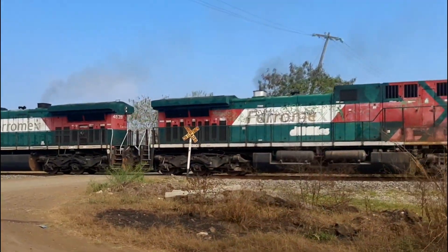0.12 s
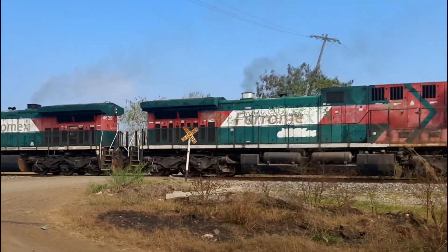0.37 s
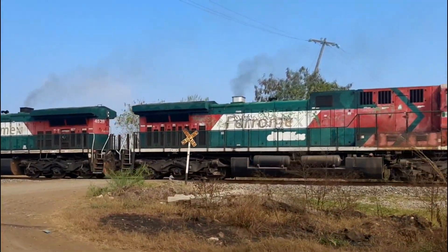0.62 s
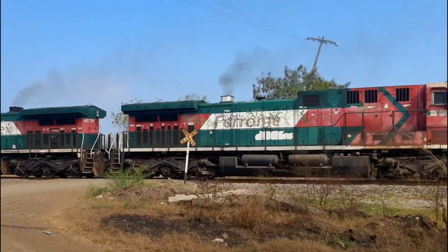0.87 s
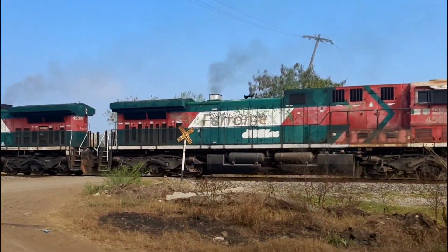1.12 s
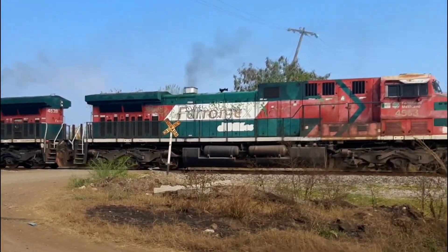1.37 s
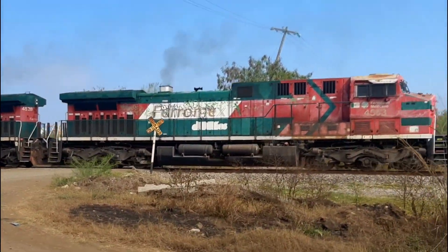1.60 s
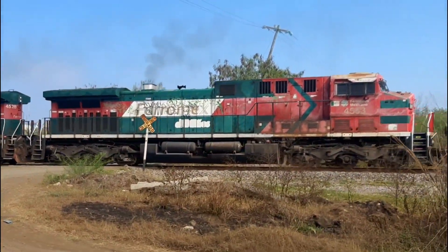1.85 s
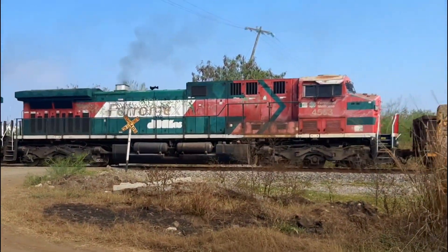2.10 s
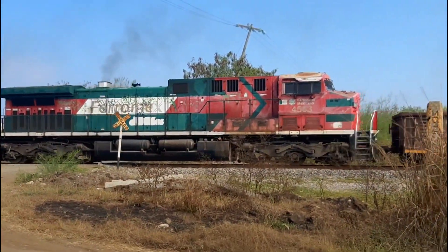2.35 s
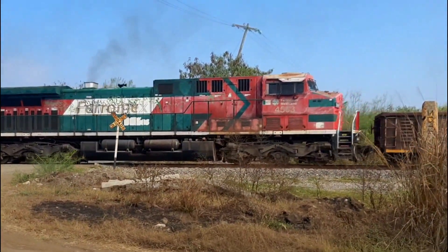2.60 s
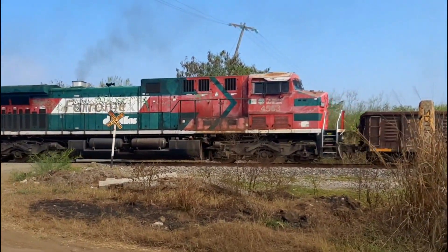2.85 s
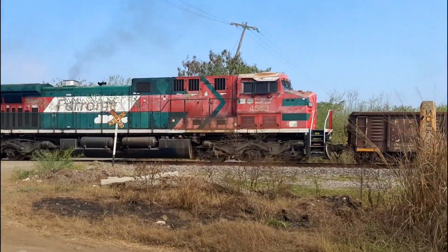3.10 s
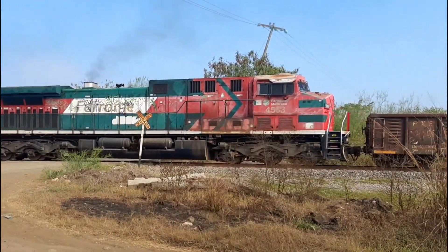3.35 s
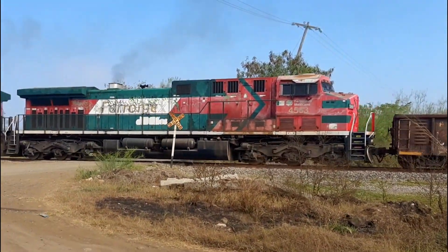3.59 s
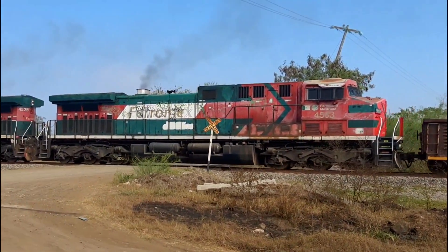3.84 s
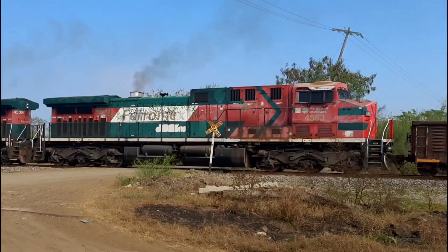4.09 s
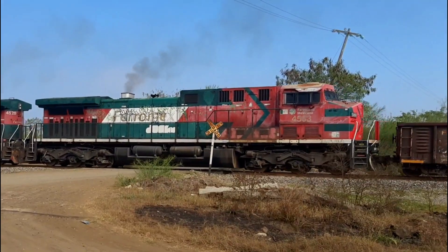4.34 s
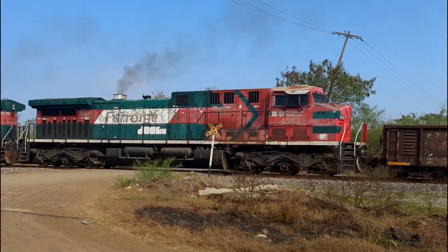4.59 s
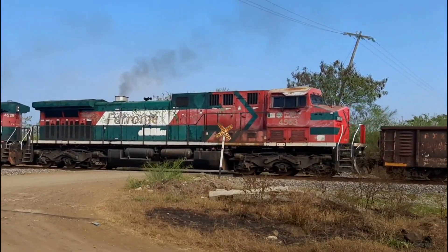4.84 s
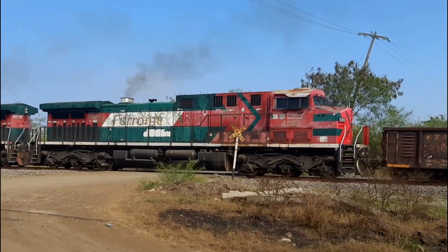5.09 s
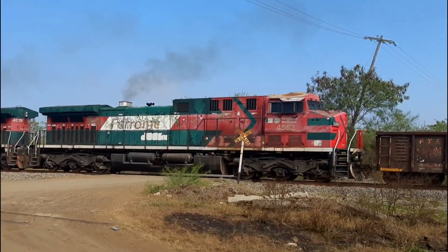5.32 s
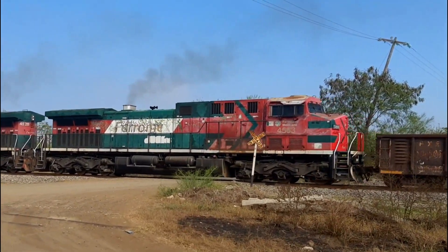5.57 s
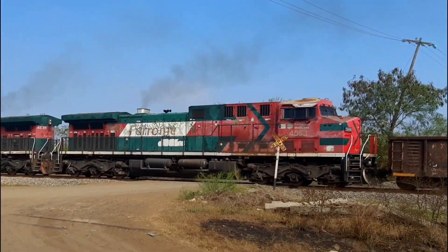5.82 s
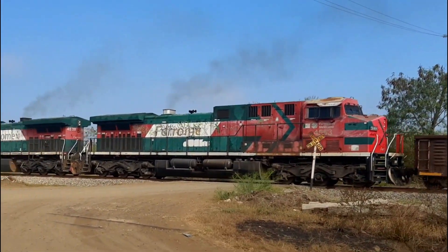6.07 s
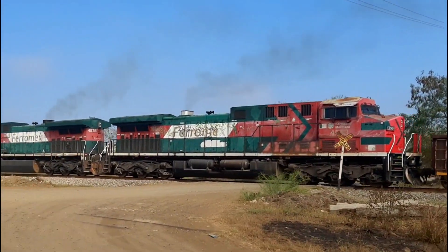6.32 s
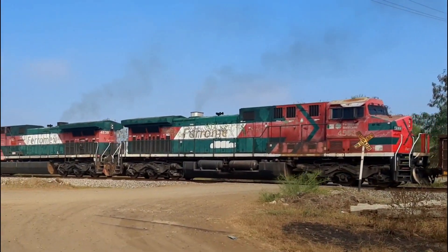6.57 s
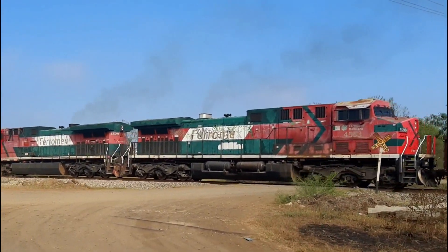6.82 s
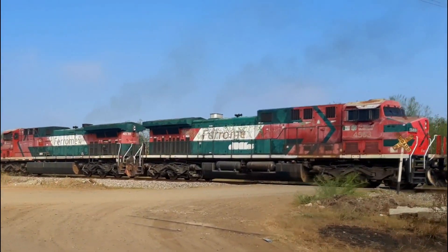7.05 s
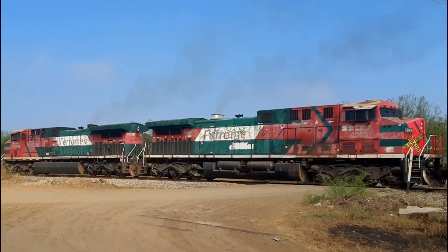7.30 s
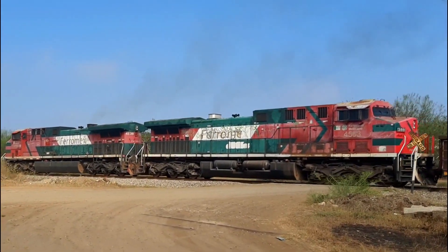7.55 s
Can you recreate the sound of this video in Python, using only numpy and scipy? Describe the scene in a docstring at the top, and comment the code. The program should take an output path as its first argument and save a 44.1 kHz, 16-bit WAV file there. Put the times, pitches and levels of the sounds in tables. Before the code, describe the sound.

A close, open-air stereo pickup of paired diesel engines under load: continuous low pulsing and rough exhaust roar, slowly speeding up from start to end. Bright air hiss is stronger early, then duller, with clustered puffs around 2 and 6 to 7 seconds. Short grainy valve bursts punctuate it, fan noise swells, a faint whine comes and goes, and wind briefly bumps the microphone ports.

```python
"""A deep throb runs throughout, over a broad roar: two diesel locomotives pull away over a crossing.
Their engines speed up almost in step, and their exhaust tones beat as they slip against each other.
Filtered noise makes the roar of stacks and the hissing, puffing air leak; fans rush in two narrow bands.
A gear whines as a wavering tone, drain valves spit bursts of grainy noise,
and a few wind pops, short dying tones, hit the microphone ports."""
import sys
import numpy as np
from scipy import signal
from scipy.fft import rfft, irfft
from scipy.io import wavfile
from scipy.ndimage import uniform_filter1d, map_coordinates

SR = 44100
rng = np.random.default_rng(int(sys.argv[2]) if len(sys.argv) > 2 else 0)


def makeup_ratio(level_db):
    """Linear amplitude ratio for a level in decibels (20 dB per factor of ten)."""
    decades = np.asarray(level_db, float) / 20
    return 10 ** decades


def store_pcm(level_fs):
    """Save levels as 16-bit WAV."""
    pcm = np.round(np.clip(level_fs, -1, 1) * 32767).astype(np.int16)
    wavfile.write(sys.argv[1], SR, np.atleast_2d(pcm).T)


N = 338687
T = np.arange(N) / SR  # time of each sample, s

# How fast the engines run: time_s, first_engine_cycles_per_s, second_engine_cycles_per_s
ENGINE_SPEED = [(0.0, 5.96, 5.958), (0.8, 6.087, 6.091), (1.5, 6.206, 6.235), (2.2, 6.342, 6.365),
                (3.0, 6.466, 6.446), (3.8, 6.576, 6.572), (4.6, 6.706, 6.711), (5.2, 6.786, 6.841),
                (5.6, 6.884, 6.928), (6.0, 6.986, 7.018), (6.5, 7.073, 7.1), (7.0, 7.18, 7.17),
                (7.68, 7.216, 7.241)]
START_TURNS = (.537, .9653)  # where each engine stands in its cycle at the start
# Strong exhaust tones before boom and gain: cycle_multiple,
# first_engine_start_db, first_engine_end_db, second_engine_start_db, second_engine_end_db
STRONG_ORDERS = [(8, -30.5, -28.0, -33.5, -40.0), (9, -32.5, -38.5, -43.5, -29.0),
                 (10, -32.5, -43.5, -31.0, -39.5), (11, -22.0, -35.0, -35.0, -23.0),
                 (12, -33.5, -35.0, -34.0, -27.5), (13, -28.0, -9.5, -20.5, -14.5),
                 (14, -34.0, -35.0, -25.0, -29.5), (15, -20.0, -40.0, -32.0, -30.5),
                 (16, -33.0, -53.0, -31.0, -26.0), (17, -19.0, -60.0, -41.0, -19.5),
                 (18, -32.0, -40.0, -47.5, -54.5), (19, -16.0, -53.5, -36.5, -24.0),
                 (20, -30.0, -40.0, -35.5, -32.5), (28, -34.5, -37.0, -32.0, -36.0),
                 (29, -41.5, -53.5, -32.5, -38.5)]
# Exhaust tones that peak together; the others start anywhere: cycle_multiple
IN_STEP_ORDERS = (11, 12, 13)
# The stacks boom near their resonance: pitch_hz, gain_db
STACK_BOOM = [(50, -7.5), (66, 1.5), (74, 9.5), (80, 7.0), (87, -5.0), (94, -8.0), (104, -0.5), (118, -4.0),
              (135, -3.0)]
# Level curve for the fainter exhaust tones, before gain: cycle_multiple, level_db
WEAK_LEVELS = [(21, -47), (24, -51), (26, -51), (27, -45), (31, -45), (34, -51), (36, -47.5), (40, -54)]
# Which fainter exhaust tones sound: cycle_multiple
WEAK_ORDERS = (21, 22, 23, 24, 25, 26, 27, 30, 31, 32, 33, 34, 35, 36, 37, 38, 39, 40)
EXHAUST_GAIN_DB = (0.33, 0.43)  # at start and end, almost steady

# Loudness of the stacks' roar: time_s, level_db
STACK_LEVEL = [(0, -32), (1.3, -32.5), (2.3, -34), (3.4, -34), (4.5, -32.5), (6, -32), (7, -31),
               (7.68, -31)]
# Colour of the low rumble: pitch_hz, relative_db_per_hz
RUMBLE_COLOUR = [(20, -21), (42, -21), (60, 5.5), (90, -1), (140, 4), (190, -3), (260, -7), (330, -12),
                 (500, -72), (900, -120)]
# Three colours of the stacks' roar in turn: pitch_hz, relative_db_per_hz
STACKS_EARLY = [(190, -15.5), (330, -9), (601, -2.5), (666, -4.5), (1130, -9), (1630, -13), (1790, -9),
                (2020, -12), (2230, -10.5), (3000, -22), (3900, -52), (6600, -120)]
STACKS_MIDDLE = [(190, -14), (330, -3.5), (491, -14.5), (601, -4), (730, -2.5), (928, -9), (1140, -11),
                 (1360, -9), (2130, -9), (2340, -10), (3000, -16), (3900, -55), (6600, -120)]
STACKS_LATE = [(190, -27), (330, -11), (376, -10), (443, -3.5), (538, -5.5), (636, 0), (920, -12.5),
               (1110, -5), (1330, -13), (1600, -2.5), (1790, -8.5), (2050, -4), (2300, -9), (3000, -9),
               (3900, -15.5), (6600, -120)]
# The air leak turns away: time_s, level_db, later_colour_share_0_to_1
LEAK_COURSE = [(0, -30, 0.34), (.6, -33, 0.12), (1.4, -32.5, 0.18), (2.5, -34, .8), (3.4, -38.5, 0.77),
               (4.1, -37, 0.65), (5, -35.5, 0.74), (6.1, -35, 0.77), (7.68, -37, 0.58)]
# Colour of the leak, earlier and later: pitch_hz, relative_db_per_hz
LEAK_EARLY_COLOUR = [(1530, -33), (2600, -35), (2740, -4), (3720, -6.5), (5440, 2), (6390, 2), (7240, -2.5),
                     (8370, -22.5), (9000, -45), (11700, -62), (19800, -120)]
LEAK_LATE_COLOUR = [(1530, -30), (2600, -21), (3090, -9.5), (3350, 1), (3550, -3.5), (3860, 1),
                    (4170, -0.5), (4510, 1), (6160, -5.5), (7310, -21.5), (8500, -39), (9000, -43),
                    (11700, -68), (19800, -120)]
# Puffs of the air leak: centre_s, level_db
LEAK_PUFFS = [(1.27, -31.5), (2.13, -31.5), (2.285, -31), (2.45, -35), (2.53, -35), (4.66, -33),
              (6.19, -31), (6.3, -32.5), (6.47, -36), (6.62, -35), (6.76, -30), (6.91, -31), (7.0, -36.5),
              (7.47, -35)]
# Colour of the highest hiss: pitch_hz, relative_db_per_hz
TOP_COLOUR = [(6000, -38), (8600, -6.5), (9600, -2.5), (11100, 1), (14500, -3), (15700, -6.5)]
# How alike left and right are, for all the roar: pitch_hz, likeness_0_to_1
LIKENESS = [(60, 0.61), (150, 1), (380, 0.92), (950, 0.87), (1500, 0.32), (2400, 0.13), (5500, 0.5),
            (8000, 0.13), (15000, .25)]
RUMBLE_OVER_ROAR_DB, RUMBLE_SWING = 5.5, 0.74  # swing: share of the roar's rise and fall in dB
TOP_OVER_LEAK_DB, PUFF_WIDTH_S = -19.5, 0.016
# how much later the left side hears it, at start and end: the train crosses the front
STACK_LAG_MS, LEAK_LAG_MS = (-.12, 0.11), (-0.12, 0.22)
# ground echo: shortest delay, when that happens, growth per second squared
ECHO_MS, ECHO_NEAR_S, ECHO_GROWS_MS = 1.255, 3.21, 0.0384

# Two rushing bands of fans and blowers: time_s, lower_hz, upper_hz
FAN_PITCH = [(0, 1525, 2380), (1.3, 1520, 2390), (2.2, 1570, 2345), (4.3, 1700, 2370), (5.2, 1580, 2010),
             (7.68, 1589, 2048)]
# Their swells: centre_s, level_db, width_s, band (0 lower, 1 upper)
FAN_SWELLS = [(1.22, -40.5, 0.04, 0), (1.29, -40.5, 0.06, 1), (1.7, -44.5, 0.27, 0), (4.1, -44.5, 0.44, 1),
              (4.15, -44, .25, 0), (5, -43.5, 0.55, 0), (5.2, -51, 0.66, 1), (6.1, -47.5, 0.27, 0),
              (6.6, -44.5, 0.22, 1), (7.05, -45.5, .25, 1), (7.001, -51, .2, 0), (7.66, -42, .2, 1),
              (7.67, -44, 0.22, 0)]
FAN_FLOOR_DB = -55.5  # level between swells, before flicker

# Gear whine swells: centre_s, level_db, width_s
WHINE_SWELLS = [(1.2, -53, 0.44), (2.2, -49, 0.28), (3.8, -44, 0.14), (6.3, -51.5, 0.35)]
WHINE_FLOOR_DB = -58.5  # level between swells, before flicker

# Valve spits: start_s, level_db, hold_s, fall_by_60_db_s, left_over_right_db
VALVE_SPITS = [(.318, -29, .004, 0.046, -16.5), (1.533, -21, 0.041, 0.083, -4.5),
               (2.369, -36, 0.0059, 0.077, 7), (3.552, -27.5, .014, 0.22, 3),
               (4.265, -35.5, 0.0079, 0.1, 5), (5.096, -34, 0.0052, .047, -4.5),
               (6.113, -26.5, 0.0076, .15, 1), (6.431, -47, .0049, .029, 1), (6.771, -31.5, 0.005, .088, 3),
               (7.662, -30.5, 0.012, .1, 7.5)]
# Colour of a spit: pitch_hz, relative_db
SPIT_COLOUR = [(1470, -45), (2500, -19), (3010, -8.5), (3530, -25), (3810, -9), (5070, -7.5), (6380, 0),
               (9010, -27), (10500, -16.5), (15700, -15)]
RISE_SHARE = .55  # opening time over holding time
# brightness in dB per octave; a slowly closing valve is duller, by this slope per second of fall
BRIGHT_DB, BRIGHT_FALL_DB = 2, -14

# Wind pops, level before the decay: start_s, level_db, pitch_hz, port (0 left, 1 right)
WIND_POPS = [(2.060, -15, 560, 0), (2.106, -18, 440, 0), (2.209, -14.5, 395, 0), (2.894, -22, 300, 0)]


def unit(x):
    """Scales a sound to an average strength (rms) of 1."""
    return x / np.sqrt(np.mean(x ** 2) + 1e-20)


def along(points, hz):
    """Reads a curve of pitch and value on a logarithmic pitch axis."""
    pitch, value = np.transpose(points)
    return np.interp(np.log(hz + 1), np.log(pitch + 1), value)


def curves(rows):
    """Gives one value per sample for each column after the time."""
    s, *columns = np.transpose(rows)
    return np.array([np.interp(T, s, column) for column in columns])


def across(start, end):
    """Changes in a straight line from the first moment to the last."""
    return start + (end - start) * T / T[-1]


def wobble(rate):
    """Draws a smooth random curve through `rate` random points a second."""
    coarse = T[::32]
    place = np.clip(coarse * rate, 0, 1498)
    return np.interp(T, coarse, map_coordinates(rng.standard_normal(1500), [place]))


def swell(s, db, width):
    """Gives the power of a bell-shaped swell."""
    return makeup_ratio(2 * db) * np.exp(-((T - s) / width) ** 2)


def rush(spectra, stage, patchy_db, lag_ms, echo_ms=None, echo=0):
    """Makes stereo noise of rms 1 in narrow streaks; stage moves its colour through the spectra."""
    hz, t, z = signal.stft(rng.standard_normal((2, N + SR)), SR, nperseg=2048)

    def frames(curve):
        return np.interp(t - .5, T, curve)  # the noise has a spare half second at each end

    share = np.clip(1 - abs(frames(stage) - np.arange(len(spectra))[:, None]), 0, 1)
    power = np.array([makeup_ratio(2 * along(points, hz)) for points in spectra])
    power = power / power.sum(axis=1, keepdims=True)
    colour = np.sqrt(power.T @ share)
    patches = uniform_filter1d(rng.standard_normal(z.shape[1:]), size=5, axis=0)
    patches = unit(uniform_filter1d(patches, size=16, axis=1))
    # blend a shared noise with an opposed one to set how alike the ports are
    turn = np.arccos(np.clip(along(LIKENESS, hz), -1, 1))[:, None] / 2
    shared, own = z * colour * makeup_ratio(patchy_db * patches) * [np.cos(turn), np.sin(turn)]
    # the sound reaches one port a little later, and may come once more off the ground
    lag = np.exp(-1j * np.pi * np.outer(hz, frames(lag_ms) / 1000))
    ground = 1
    if echo:
        ground = 1 + echo * np.exp(-2j * np.pi * np.outer(hz, frames(echo_ms) / 1000))
    pair = np.array([(shared + own) * lag, (shared - own) / lag]) * ground
    sound = signal.istft(pair, nperseg=2048)[1]
    return unit(sound[:, SR // 2:][:, :N])


def cycles():
    """Adds up the turns of each engine's four-stroke cycle from its speed."""
    return np.cumsum(curves(ENGINE_SPEED), axis=1) / SR + np.array(START_TURNS)[:, None]


def exhaust(turns):
    """Uneven firing gives tones at cycle multiples, which add or cancel as the two engines slip."""
    def line(k, shift):
        return np.cos(2 * np.pi * (round(k) * turns + shift))

    speed = curves(ENGINE_SPEED).mean(axis=0)
    tones = np.zeros(N)
    for k, first_start, first_end, second_start, second_end in STRONG_ORDERS:
        shift = rng.random() * (k not in IN_STEP_ORDERS)
        level = makeup_ratio([across(first_start, first_end), across(second_start, second_end)])
        boom = makeup_ratio(along(STACK_BOOM, k * speed))
        tones += boom * (level * line(k, shift)).sum(axis=0)
    for k in WEAK_ORDERS:
        level = makeup_ratio(np.interp(k, *np.transpose(WEAK_LEVELS)) + 1.5 * wobble(1.17))
        shift = rng.random() + 0.084 * wobble(1.198)
        tones += level * line(k, shift).sum(axis=0)
    return 2 ** .5 * makeup_ratio(across(*EXHAUST_GAIN_DB)) * tones * makeup_ratio([[-.15], [.15]])


def rumble(roar_db):
    """Low noise rises and falls with the roar, over a smaller range."""
    average = roar_db.mean()
    level_db = average + RUMBLE_OVER_ROAR_DB + RUMBLE_SWING * (roar_db - average) + .8 * wobble(2.53)
    still = 0 * T
    return makeup_ratio(level_db) * rush([RUMBLE_COLOUR], still, 1.0, still)


def stacks(roar_db, flutter):
    """The stacks' noise changes colour and bearing as the train moves."""
    stage = np.interp(T, (1.3, 2.4, 3.5, 4.5), (0, 1, 1, 2))
    noise = rush([STACKS_EARLY, STACKS_MIDDLE, STACKS_LATE], stage, 1.1, across(*STACK_LAG_MS))
    return makeup_ratio(roar_db + .4 * wobble(11) + 0.45 * flutter) * noise


def leak(flutter):
    """Escaping air is a hiss with grainy puffs, a ground echo and a fainter top hiss."""
    leak_db, stage = curves(LEAK_COURSE)
    lag_ms = across(*LEAK_LAG_MS)
    echo_ms = ECHO_MS + ECHO_GROWS_MS * (T - ECHO_NEAR_S) ** 2
    air = rush([LEAK_EARLY_COLOUR, LEAK_LATE_COLOUR], np.clip(stage, 0, 1), 1.3, lag_ms, echo_ms, .18)
    puffs = sum(swell(s, db, PUFF_WIDTH_S) for s, db in LEAK_PUFFS)
    grit = makeup_ratio(2.5 * wobble(150))
    level = np.sqrt(makeup_ratio(2 * (leak_db + 0.95 * flutter)) + puffs * grit ** 2)
    hiss = level * air * makeup_ratio([[-1.1], [1.1]])
    top_db = leak_db + TOP_OVER_LEAK_DB + 1.6 * wobble(3) + .6 * flutter + 1.6 * wobble(66)
    top = makeup_ratio(top_db) * rush([TOP_COLOUR], 0 * T, .5, lag_ms)
    return hiss + top * makeup_ratio([[-.6], [.6]])


def roar():
    """Rumble, stacks and leaking air sound together; stacks and leak share one flutter."""
    roar_db, = curves(STACK_LEVEL)
    flutter = wobble(22)
    return rumble(roar_db) + stacks(roar_db, flutter) + leak(flutter)


def fans():
    """Each band is a tone with random size and phase, partly different at the two ports."""
    out = np.zeros((2, N))
    for band, hz in enumerate(curves(FAN_PITCH)):
        swells = sum(swell(*row) for *row, which in FAN_SWELLS if round(which) == band)
        level = np.sqrt(makeup_ratio(2 * FAN_FLOOR_DB) + swells)
        shared, *own = [wobble(185) + 1j * wobble(185) for _ in range(3)]
        carrier = np.exp(2j * np.pi * np.cumsum(hz) / SR)
        noise = unit(((shared + 0.94 * np.array(own)) * carrier).real)
        out += level * makeup_ratio(3.26 * wobble(22)) * noise
    return out


def whine(turns):
    """A gear meshes at a fixed multiple of the first engine's speed, with a wavering phase."""
    phase = 2 * np.pi * 212 * turns[0] + 0.66 * wobble(30)
    level = np.sqrt(makeup_ratio(2 * WHINE_FLOOR_DB) + sum(swell(*row) for row in WHINE_SWELLS))
    return 2 ** .5 * level * makeup_ratio(3.1 * wobble(6.2)) * np.sin(phase)


def spits():
    """Each drain valve opens, holds and closes on a jet of grainy air, with a weak long sigh after it."""
    out, t = np.zeros((2, N + SR)), T[:SR // 4]
    hz = np.fft.rfftfreq(len(t), 1 / SR)
    for s, db, hold, fall, pan_db in VALVE_SPITS:
        rise = RISE_SHARE * hold
        tilt_db = BRIGHT_DB + BRIGHT_FALL_DB * fall
        colour = makeup_ratio(along(SPIT_COLOUR, hz) + tilt_db * np.log2(hz / 6000 + .01))
        shared, *own = rng.standard_normal((3, len(t)))
        grit = makeup_ratio(2.2 * unit(uniform_filter1d(rng.standard_normal(len(t)), size=24)))
        # the shared part reaches the right port four samples later
        ports = (np.array([shared, np.roll(shared, shift=4)]) + .9 * np.array(own)) * grit
        jet = unit(irfft(rfft(ports) * colour, len(t)))
        shut = np.clip(t - rise - hold, 0, None) / fall
        closing = makeup_ratio(-60 * shut) + 0.22 * makeup_ratio(-22 * shut)  # main fall plus the sigh
        valve = np.clip(t / rise, 0, 1) * closing
        out[:, round(s * SR):][:, :len(t)] += makeup_ratio(db) * valve * jet * makeup_ratio([[pan_db / 2], [-pan_db / 2]])
    return out[:, :N]


def pops():
    """A wind eddy pushes one port: a short tone that dies by 60 dB in 19 ms."""
    out, t = np.zeros((2, N)), T[:SR // 20]
    for s, db, hz, port in WIND_POPS:
        push = makeup_ratio(db) * np.sin(2 * np.pi * hz * t) * makeup_ratio(-60 * t / 0.019)
        out[int(round(port)), round(s * SR):][:len(t)] += push
    return out


def scene():
    """Adds up everything at the crossing."""
    turns = cycles()
    return exhaust(turns) + roar() + fans() + whine(turns) + spits() + pops()


def low_pass(x):
    """Removes everything above the highest recorded frequency."""
    return signal.sosfilt(signal.butter(12, 15810, fs=SR, output="sos"), x)


def record(dry):
    """The microphone input gently rounds off the highest peaks."""
    mix = dry / (1 + abs(dry / 0.76) ** 8) ** (1 / 8)
    return low_pass(mix)


dry = scene()
out = record(dry)
store_pcm(out)
```